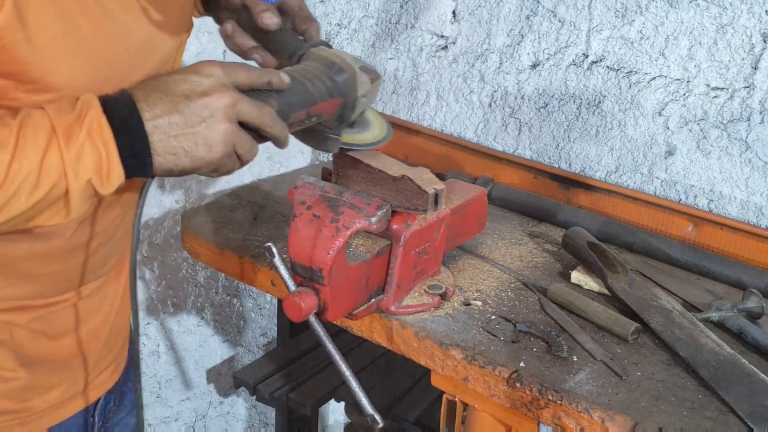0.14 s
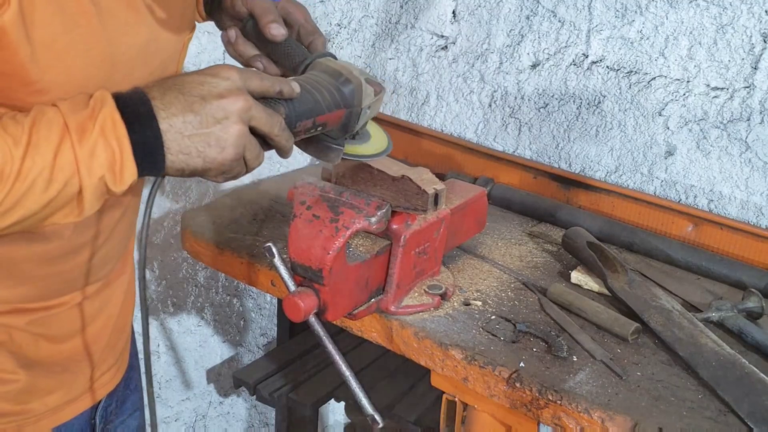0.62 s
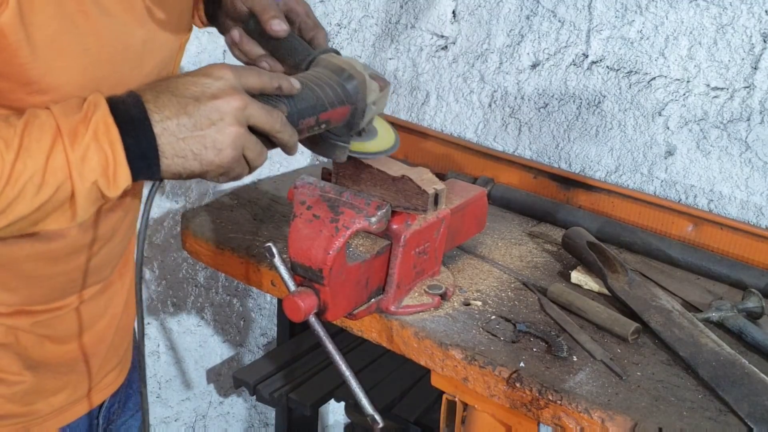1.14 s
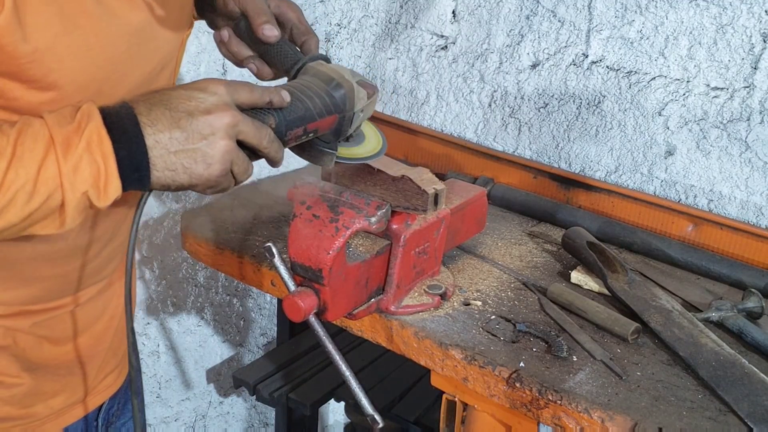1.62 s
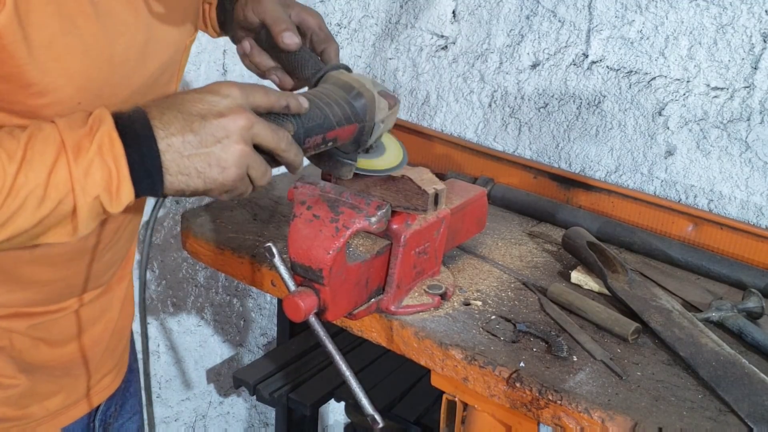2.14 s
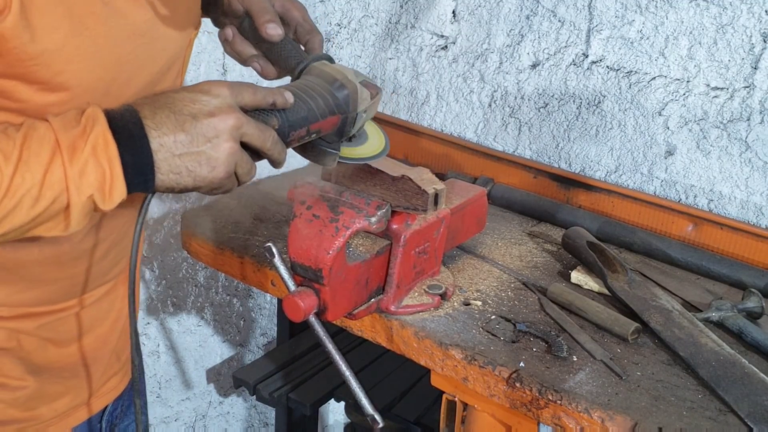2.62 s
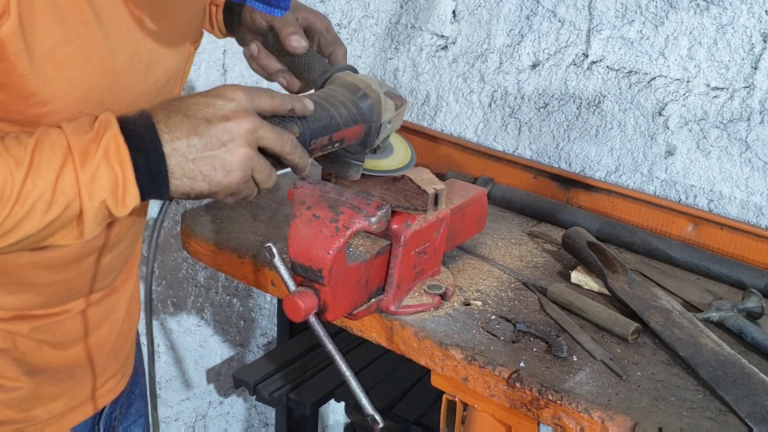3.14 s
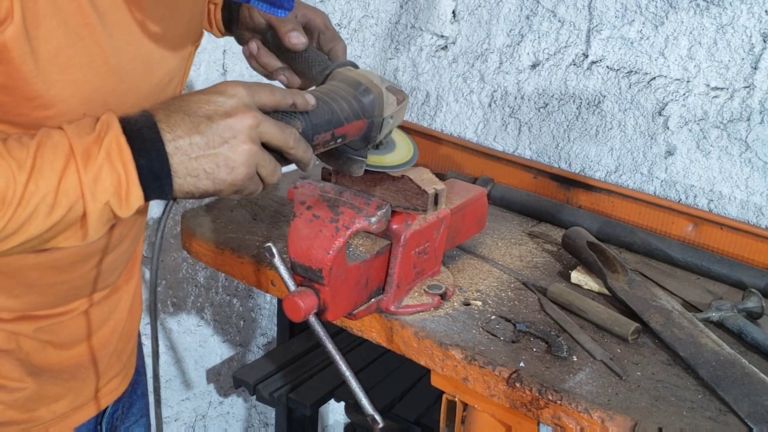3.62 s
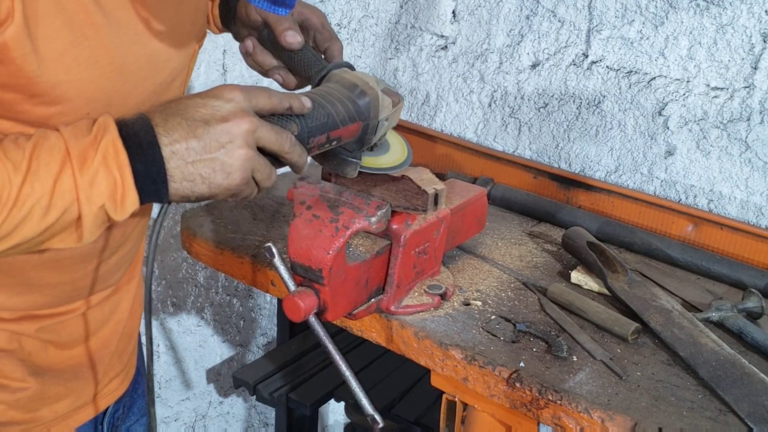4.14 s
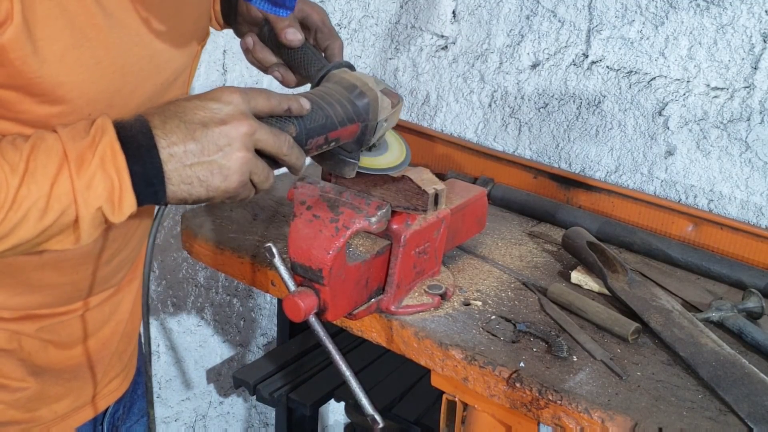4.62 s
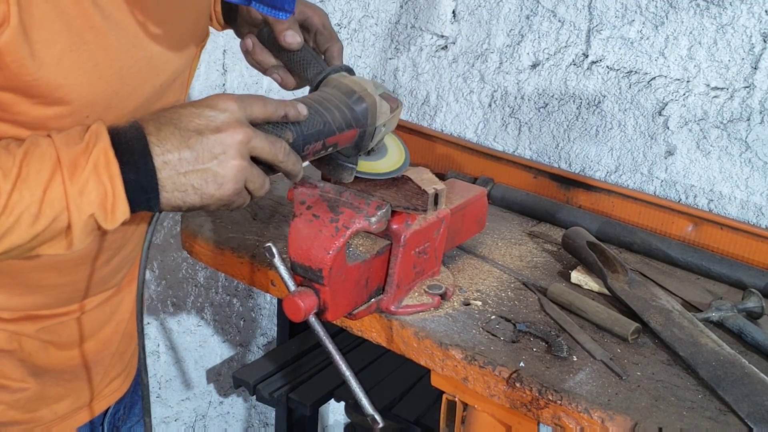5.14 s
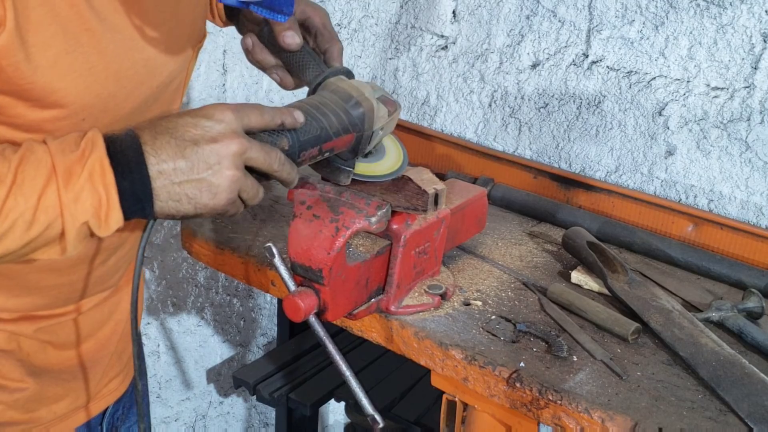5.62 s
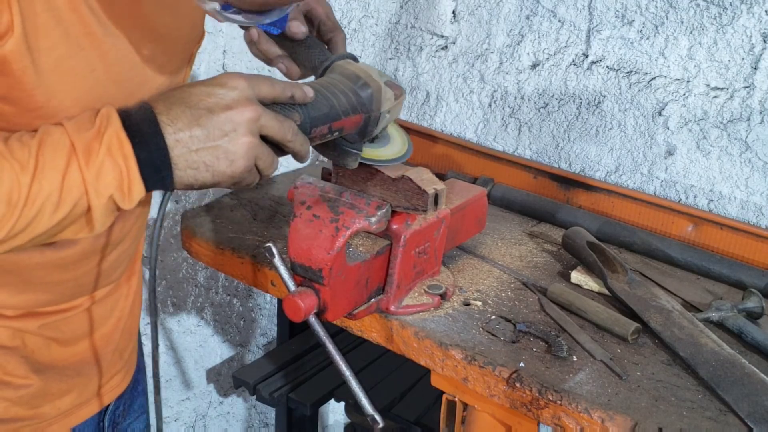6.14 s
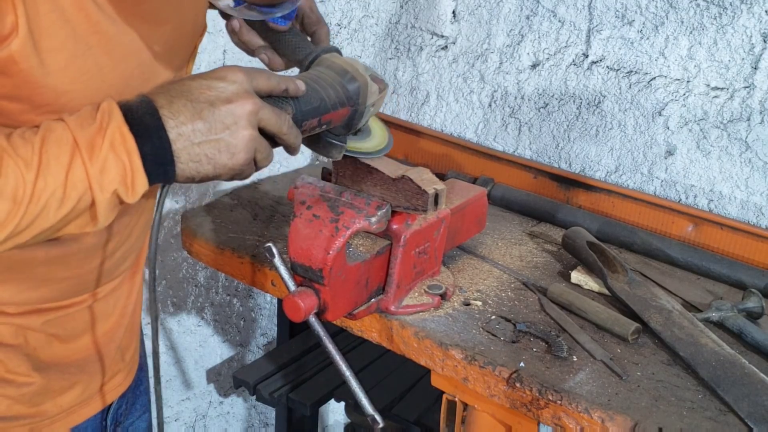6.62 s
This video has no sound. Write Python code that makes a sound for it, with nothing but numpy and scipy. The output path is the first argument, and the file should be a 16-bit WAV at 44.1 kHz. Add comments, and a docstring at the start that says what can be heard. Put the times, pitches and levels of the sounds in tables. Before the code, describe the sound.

An angle grinder with a sanding disc runs throughout, close in stereo, beside a wall that returns short sparse reflections. At 0 seconds a stroke is already under way: harsh, bright grit hiss, a fluttering scrape and a nasal gear whine around five kilohertz glide downward until the lift near 0.1. The disc stays slow for a moment, then speeds up under steady fan roar and a faint leftover hiss. Long strokes fall at about 0.46-1.07, 1.44-2.0 and 2.3-2.9, each starting with a crisp spit and sagging clearly in pitch. Seven shorter strokes begin near 3.26, 3.86, 4.35, 4.87, 5.32, 5.74 and 6.39, lasting about 0.2-0.3 seconds, with shallower pitch drops and generally weaker whine. The hiss between them grows slightly stronger. After the last lift near 6.7, the motor keeps running to the end.

```python
"""An angle grinder with a sanding disc works a piece of wood in a vice, beside a wall.
It opens inside a stroke: grit hisses as noise, over a scrape and gear whine made of sines on turns of the disc.
Each stroke slows the disc, so scrape and whine slide down in pitch; after the lift the disc stays slow briefly,
then speeds up again under the steady noise of the motor fan, with a faint hiss left over.
Three more long strokes follow, then seven shorter ones; sparse echoes surround the work."""
import sys
import numpy as np
from scipy import signal
from scipy.fft import rfft, irfft
from scipy.io import wavfile
from scipy.ndimage import uniform_filter1d

SR = 44100
rng = np.random.default_rng(int(sys.argv[2]) if len(sys.argv) > 2 else 0)


def store_wav(level_fs):
    """Save 16-bit WAV to argv[1]."""
    pcm = np.round(np.clip(np.atleast_2d(level_fs), -1, 1) * 32767)
    wavfile.write(sys.argv[1], SR, pcm.T.astype(np.int16))


def linear_from_db(decibels):
    """Turn decibels (scalar or array-like) into linear amplitude factors; 0 gives 1."""
    return 10 ** (np.asarray(decibels, float) / 20)


N = 298116  # samples
RING_TEETH, PINION_TEETH = 37, 10  # bevel gear: ring on the disc shaft, pinion on the rotor


def evened(x):
    """Scales to rms 1."""
    return x / np.sqrt(np.mean(x ** 2) + 1e-20)


def read(points, hz):
    """Reads a spectrum table at the given frequencies, along a log frequency axis."""
    f, value = np.transpose(points)
    return np.interp(np.log(hz + 1), np.log(f + 1), value)


def lift_db(modes, hz):
    """How far a set of resonances raises a spectrum."""
    gain = sum(linear_from_db(db) / (1 + (2 * (hz - f) / width) ** 2) for f, width, db in modes)
    return 20 * np.log10(1 + gain)


def wander(count, seconds):
    """Slow random curves, one a row, of rms 1 taken together."""
    size = max(round(seconds * SR / 256), 1)
    steps = rng.standard_normal((count, N // 256 + 2))
    steps = evened(uniform_filter1d(steps, size, axis=1))
    return np.array([np.interp(np.arange(N) / 256, np.arange(len(row)), row) for row in steps])


def noise(field_db, patchy_db):
    """Two partly alike channels of random short-time spectra; field_db(hz, t) is their colour."""
    # likeness of the two channels: pitch_hz, likeness (0 to 1)
    likeness = [(60, 0.18), (180, 0.24), (520, 0.71), (1550, 0.12), (4560, 0.12), (13500, 0.13)]
    frames, hz = N // 256 + 5, np.fft.rfftfreq(1024, 1 / SR)[:, None]
    a, b, c, d, patches = rng.standard_normal((frames, 513, 5)).T
    patches = uniform_filter1d(patches, size=3, axis=0)  # across frequency
    patches = evened(uniform_filter1d(patches, size=10, axis=1))  # across time
    same = np.clip(read(likeness, hz), 0, 1)
    left = a + 1j * b
    right = same * left + np.sqrt(1 - same ** 2) * (c + 1j * d)
    spectra = np.array([left, right])
    spectra *= linear_from_db(field_db(hz, np.arange(frames) * 256 / SR) + patchy_db * patches)
    return signal.istft(spectra, nperseg=1024, noverlap=768)[1][:, :N]


def tones(turns, rows, drift_db, seconds):
    """Sines on multiples of a shaft, roughened by random swells and phase slips, partly separate in the two ears."""
    out = np.zeros((2, N))
    for multiple, db in rows:
        swell, both_slip, *ear_slips = wander(count=4, seconds=seconds)
        phase = 2 * np.pi * (multiple * turns + rng.random())
        phase = phase + .5 * both_slip + 0.68 * np.array(ear_slips)
        level = linear_from_db(db + drift_db * np.clip(swell, -3, 1.5))
        out += np.sqrt(2) * level * np.cos(phase)
    return out


def timbre_db(hz, body_db, fine_db):
    """The wood's low body and the finest grit colour the sanding."""
    body = body_db / (1 + (hz / 2200) ** 4) / (1 + (500 / (hz + 1)) ** 2)
    fine = fine_db / (1 + (7000 / (hz + 1)) ** 6)
    return body + fine


def stroke(t):
    """Controls at times t: load sags the disc speed and, with pressure, sets whine, sideband, body and grit."""
    # the strokes: touch_s, lift_s, press_db (grit hiss level), whine_db (at full sag),
    # side_mid_db and side_end_db (lower sideband against the whine, early and at the lift),
    # body_db (low body of the wood), spit_db (fine grit at the touch)
    strokes = [(-.47, 0.111, -18.5, -23.5, -10, -2, 1.5, 13), (0.459, 1.07, -19.5, -25.5, -1, 1, 3, 6),
               (1.436, 1.995, -20, -24.5, -0.5, -5, 2, 3), (2.314, 2.88, -20.5, -22.5, -1, -9, -0.5, 5),
               (3.257, 3.578, -19.5, -27, 6, -18, -2.5, 4), (3.863, 4.139, -18.5, -27, 2, -9, -4.5, 3.5),
               (4.352, 4.6, -18, -27.5, 0, 0, -2.5, -1), (4.868, 5.118, -20.5, -33, 6, -14, -0.5, 5.5),
               (5.319, 5.519, -18.5, -34, -13, -18, -3, 5), (5.744, 6.044, -18, -29.5, 3, -17, -1, 8.5),
               (6.392, 6.68, -18, -30.5, 6, -6, 1, 7)]
    # S-curve slowing of each: touch_speed_hz, slowest_hz (both turns per s), sag_s, bend (under 1 sags early)
    sags = [(142, 123.4, .57, 1.26), (145.3, 121.5, .645, .7), (145, 123.7, .535, .97),
            (144.8, 123.3, .547, .9), (146.6, 134.1, .345, 1.2), (147.3, 136.5, .3, 1.18),
            (146.1, 136.8, .27, 1.36), (147.4, 142.3, .252, 1.2), (149.4, 145.9, .212, 1.14),
            (151.5, 142.4, .357, .78), (150.2, 137.3, .3, 1.09)]
    # target of the hiss between strokes: time_s, level_db
    idle_hiss = [(.4, -32), (1.4, -32), (3.8, -30.5), (5.2, -28), (6.4, -27)]
    coast_s = .09  # the disc stays slow after the lift, then speeds up evenly until the next touch
    bite_s, settle_db, settle_s, release_s = 0.011, -4.5, 0.081, 0.1  # pressure jumps, settles in, dies away
    spit_s, spit_share = 0.028, 0.56  # finest grit spits at the touch; share that reaches the whole hiss
    dull_db, dull_s = -2.5, 0.043  # finest grit is dullest this long after the lift
    whine_slope_db, whine_rise_s = 8., 0.069  # dB for tenfold sag; the teeth load up after the touch
    whine_hold_s, whine_fade_db_per_s, whine_idle_db = .02, -165, -52
    body_db_per_sag = -0.3973  # the body thins for each turn per s lost
    body_idle_db, body_idle_s = 2.5, 0.24  # and fills between strokes

    k = np.searchsorted([row[0] for row in strokes], t, "right") - 1
    touch, lift, press_db, top_db, mid_db, end_db, wood_db, spit_db = np.transpose(strokes)[:, k]
    fast, slow, sag_s, bend = np.transpose(sags)[:, k]
    since, after = t - touch, np.maximum(t - lift, 0)

    sagged = np.sin(np.pi / 2 * np.clip(since / sag_s, 0, 1) ** bend) ** 2
    knots = [(s[1] + coast_s, g[1]) for s, g in zip(strokes, sags)]
    knots = sorted(knots + [(s[0], g[0]) for s, g in zip(strokes, sags)])
    recovering = np.interp(t, *np.transpose(knots))
    speed_hz = np.where(after > coast_s, recovering, fast - (fast - slow) * sagged)

    idle_db = np.interp(t, *np.transpose(idle_hiss))
    held = np.minimum(since / bite_s, 1) * np.exp(-after / release_s)
    spit = spit_db * np.exp(-since / spit_s)
    pressed_db = press_db + settle_db * np.exp(-since / settle_s) + spit_share * spit
    pressure_db = idle_db + held * (pressed_db - idle_db)

    whine_db = top_db + whine_slope_db * np.log10(sagged + 0.02)
    whine_db = whine_db + 20 * np.log10(np.clip(since / whine_rise_s, 1e-3, 1))
    whine_db = whine_db + whine_fade_db_per_s * np.maximum(after - whine_hold_s, 0)
    side_db = whine_db + mid_db + (end_db - mid_db) * np.clip(since / (lift - touch), 0, 1) ** 4
    whine_db, side_db = np.maximum(whine_db, whine_idle_db), np.maximum(side_db, whine_idle_db)

    idle = np.minimum(after / body_idle_s, 1)
    body_db = (wood_db + body_db_per_sag * (fast - speed_hz)) * (1 - idle) + body_idle_db * idle
    fine_db = spit + dull_db * after / dull_s * np.exp(1 - after / dull_s)
    return speed_hz, pressure_db, whine_db, side_db, body_db, fine_db


def grit(turns):
    """Grains tear the wood; the disc runs slightly out of true, so the hiss throbs once a turn."""
    # colour of the hiss: pitch_hz, relative_density_db (per Hz)
    colour = [(15, -50), (25, -19), (238, -18.5), (677, -13.5), (1060, -11.5), (1520, -10), (1780, -14),
              (2140, -7.5), (2860, -7.5), (4580, 0), (5360, -2), (6440, -8), (8150, -16.5), (12100, -17),
              (13000, -18.5)]
    throb = 1 + 0.13 * np.cos(2 * np.pi * turns) + 0.048 * np.cos(4 * np.pi * turns + 5.3)
    chatter = linear_from_db(1.02 * wander(count=1, seconds=.03))  # the hand's grip trembles
    hiss = noise(lambda hz, t: read(colour, hz) + timbre_db(hz, *stroke(t)[4:]), patchy_db=2.6)
    return evened(hiss * throb * chatter)


def scrape(turns, speed_hz, pressure_db, colour):
    """The same grains meet the wood every turn: multiples of disc speed, loud as they cross the wood's modes."""
    # what repeats each turn, joined by straight lines: disc_speed_multiple, relative_level_db
    per_turn = [(5, -36), (9, -24), (11, -21), (13, -26), (16, -21), (22, -23), (25, -21), (33, -24),
                (35, -22), (39, -24)]
    # modes of the clamped piece: pitch_hz, width_hz, level_db
    wood = [(1180, 90, 0), (1500, 160, 2), (2050, 150, -4), (2340, 150, -6)]
    touch_db = -25  # pressure at which the scrape is halved, as the disc leaves the wood
    gear_orders = (RING_TEETH - 1, RING_TEETH)
    orders = [k for k in range(per_turn[0][0], per_turn[-1][0] + 1) if k not in gear_orders]
    rows = []
    for k, db in zip(orders, np.interp(orders, *np.transpose(per_turn))):
        hz = k * speed_hz
        rows.append((k, db + lift_db(wood, hz) + timbre_db(hz, *colour)))
    touching = 1 / (1 + linear_from_db(4 * (touch_db - pressure_db)))
    return linear_from_db(1.5) * touching * tones(turns, rows, drift_db=2.8, seconds=.09)


def gears(turns, speed_hz, whine_db, side_db, t):
    """Tooth mesh whine with its once-a-turn sideband, the hum of the rotor, and a faint lower tone,
    an alias of the whine that falls by nearly as many Hz."""
    # casing mode rung by the hum: pitch_hz, width_hz, level_db
    casing = [(540, 60, 3)]
    rotor_db = -55  # before the casing raises it
    alias_shift_hz, alias_db = 3828, -18.5  # downward shift (then 0.97 of the pitch), level against the whine
    teeth = [(RING_TEETH, whine_db), (RING_TEETH - 1, side_db)]
    mesh = tones(turns, teeth, drift_db=3.2, seconds=.03)
    shifted = RING_TEETH * turns - alias_shift_hz * t
    alias = tones(shifted, [(0.97, whine_db + alias_db)], drift_db=4.0, seconds=0.015)
    ratio = RING_TEETH / PINION_TEETH  # rotor turns per disc turn
    hum_db = rotor_db + lift_db(casing, ratio * speed_hz)
    hum = tones(ratio * turns, [(1, hum_db)], drift_db=0.5, seconds=.03)
    return mesh + alias + hum


def fan():
    """Cooling air roars through the housing and rings its cavities."""
    # colour of the roar: pitch_hz, relative_density_db (per Hz)
    roar = [(15, -54), (25, -21), (152, -13.5), (401, -15.5), (508, -8), (880, -6.5), (952, -10),
            (1200, -5), (1300, -0.5), (1880, -2.5), (3090, -5.5), (4460, -7.5), (13000, -26)]
    # cavities of the housing: pitch_hz, width_hz, level_db
    housing = [(2263, 160, 2), (4200, 1340, 9), (5350, 200, 10.5), (7050, 590, 10)]
    air = noise(lambda hz, t: read(roar, hz) + lift_db(housing, hz), patchy_db=2.2)
    return linear_from_db(-26.5) * evened(air)


def wall(x):
    """Sparse taps of random sign dying away: wall, bench and floor throw the sound back."""
    t = np.arange(SR // 3) / SR
    signs = rng.choice([-1., 1.], (2, len(t)))
    sparse = rng.random((2, len(t))) < .05
    taps = signs * sparse * (t > .004) * linear_from_db(-60 * t / 0.12)  # falls 60 dB in 0.12 s
    return signal.fftconvolve(x, taps / np.linalg.norm(taps[0]), axes=1)[:, :N]


def scene():
    """Grit, the scrape that repeats each turn and the gears, near a wall, with the fan."""
    t = np.arange(N) / SR
    speed_hz, pressure_db, whine_db, side_db, *colour = stroke(t)
    turns = np.cumsum(speed_hz) / SR
    sanding = linear_from_db(pressure_db) * (grit(turns) + scrape(turns, speed_hz, pressure_db, colour))
    work = sanding + gears(turns, speed_hz, whine_db, side_db, t)
    return work + linear_from_db(-8.0) * wall(work) + fan()


def top_cut(x):
    """Nothing passes above the cut-off."""
    return signal.sosfilt(signal.butter(12, 14080, fs=SR, output="sos"), x)


def record(dry):
    """Two microphone ports of unlike colour, under a band limit."""
    # balance of the ports: pitch_hz, left_minus_right_db
    lean = [(60, 3.5), (180, 3.5), (520, 1.5), (1550, 1), (4560, 3.5), (13500, -4)]
    hz = np.fft.rfftfreq(N, 1 / SR)
    ports = linear_from_db(read(lean, hz) * np.array([[.5], [-.5]]))
    ports = ports * (hz < 13100)  # top of the band
    mix = irfft(rfft(dry) * ports, N)
    return top_cut(mix)


dry = scene()
out = record(dry)
store_wav(out)
```